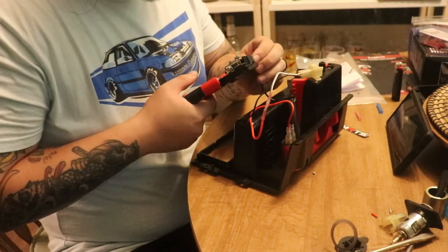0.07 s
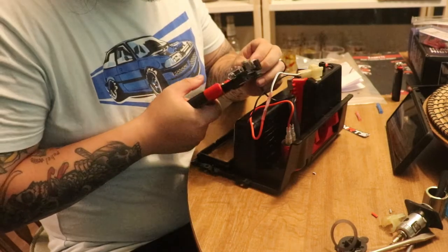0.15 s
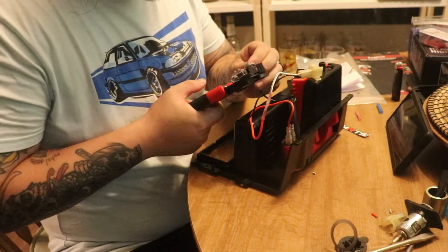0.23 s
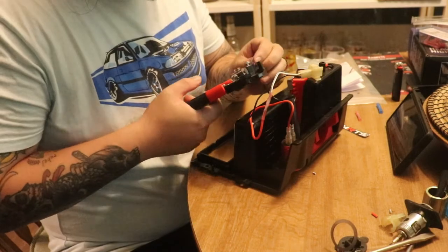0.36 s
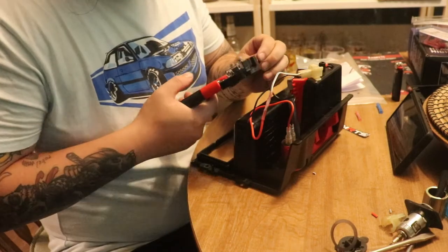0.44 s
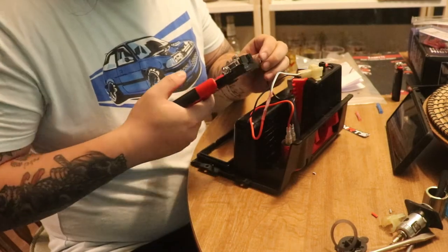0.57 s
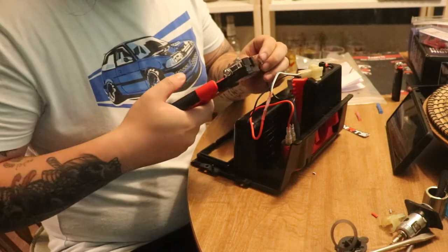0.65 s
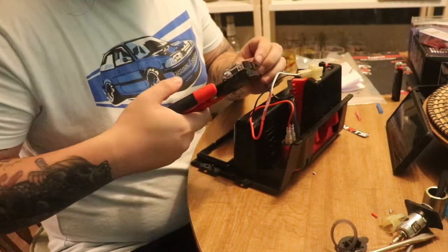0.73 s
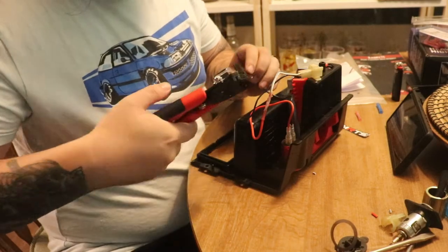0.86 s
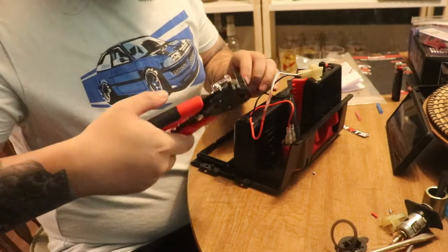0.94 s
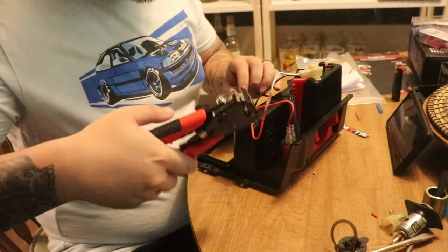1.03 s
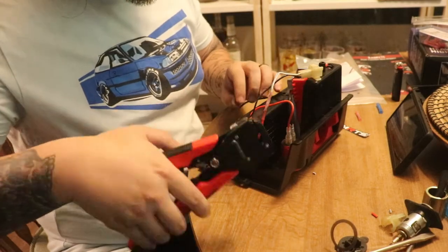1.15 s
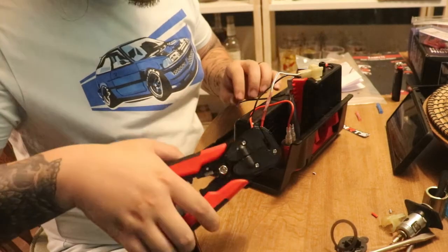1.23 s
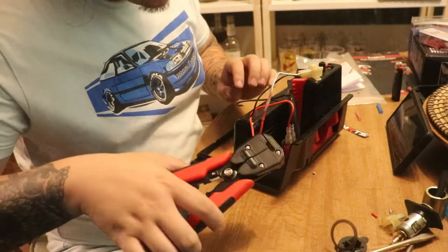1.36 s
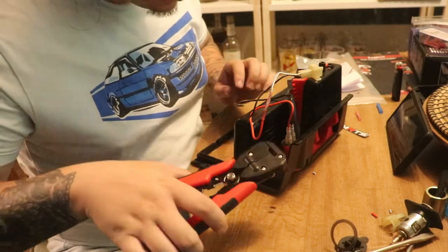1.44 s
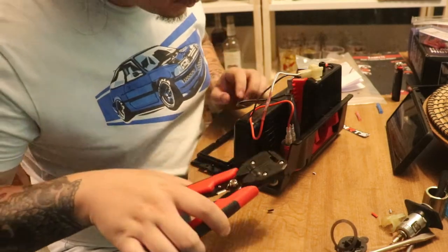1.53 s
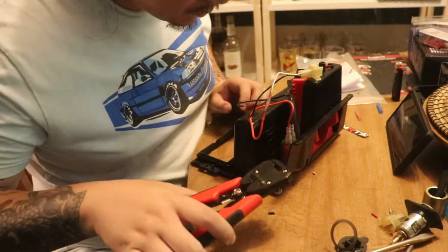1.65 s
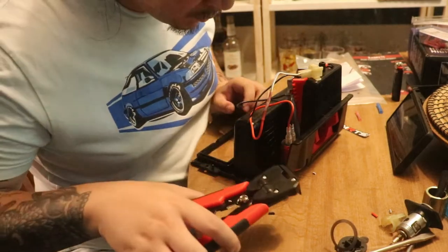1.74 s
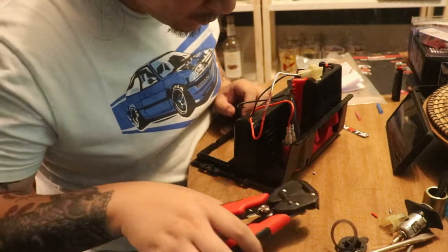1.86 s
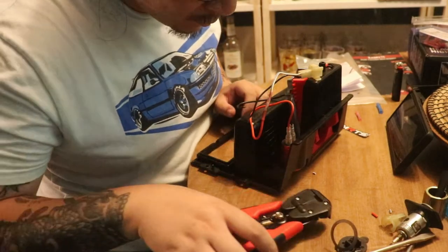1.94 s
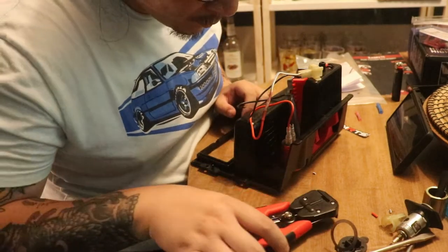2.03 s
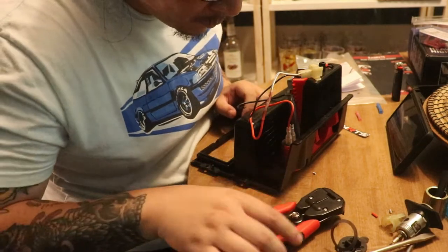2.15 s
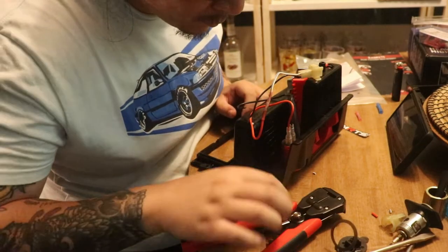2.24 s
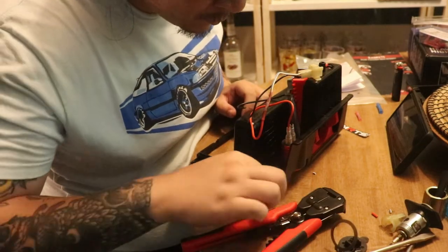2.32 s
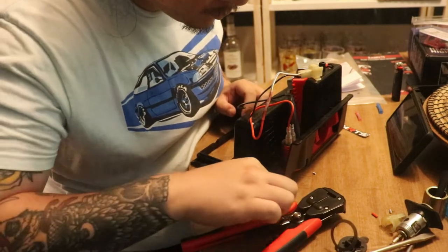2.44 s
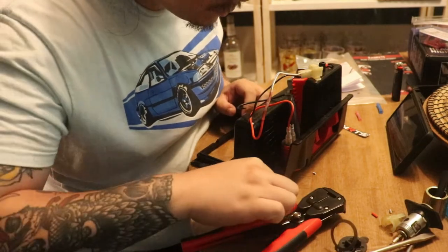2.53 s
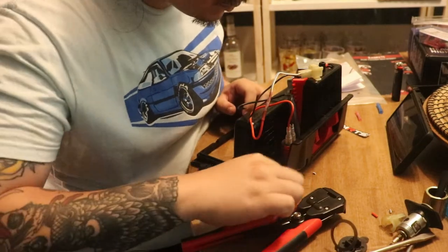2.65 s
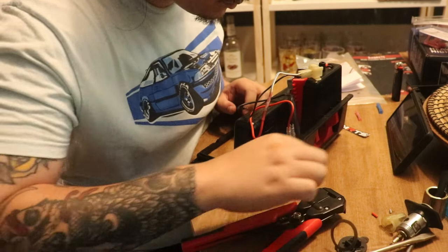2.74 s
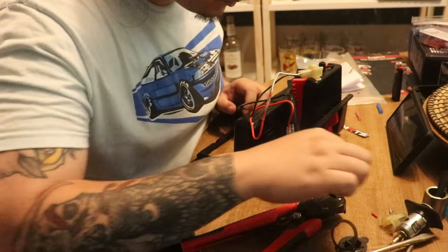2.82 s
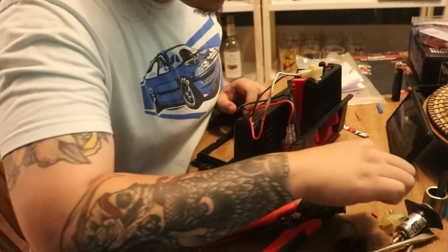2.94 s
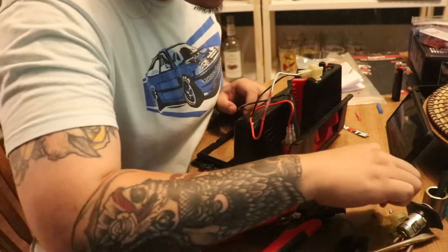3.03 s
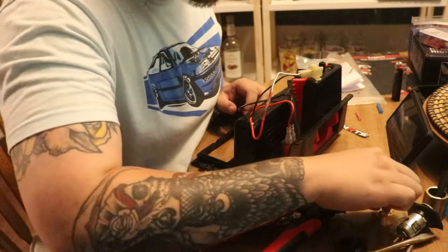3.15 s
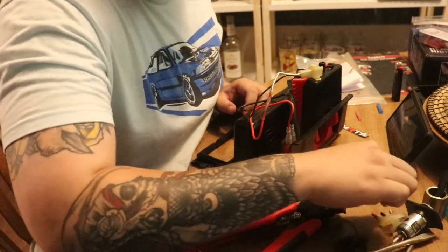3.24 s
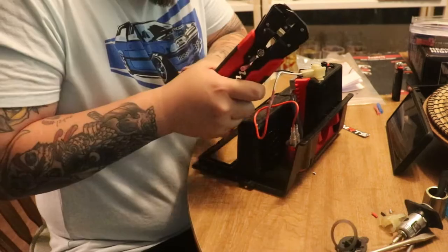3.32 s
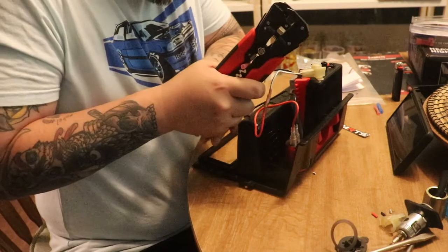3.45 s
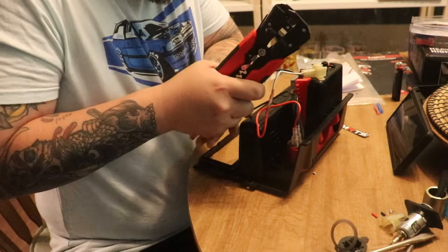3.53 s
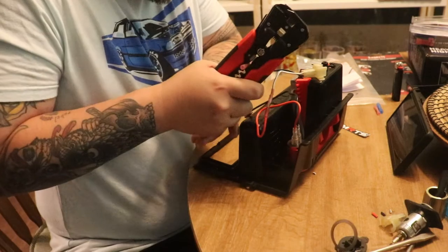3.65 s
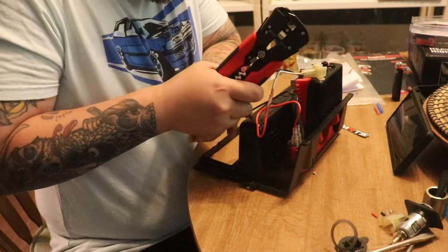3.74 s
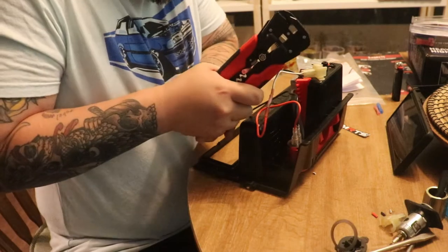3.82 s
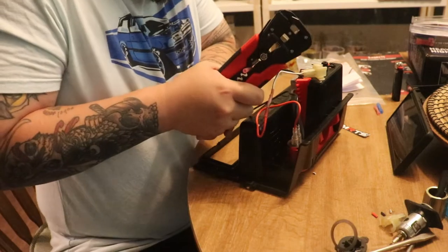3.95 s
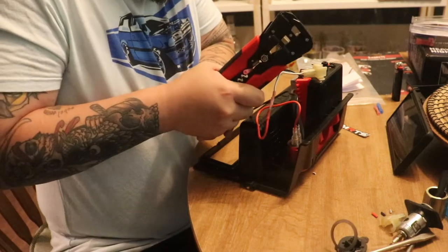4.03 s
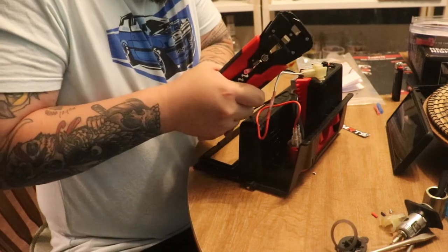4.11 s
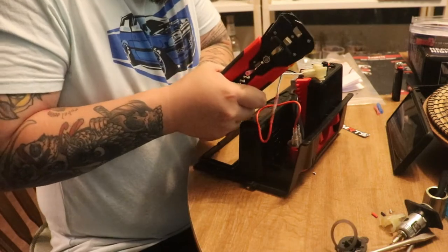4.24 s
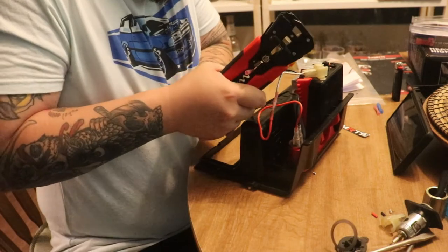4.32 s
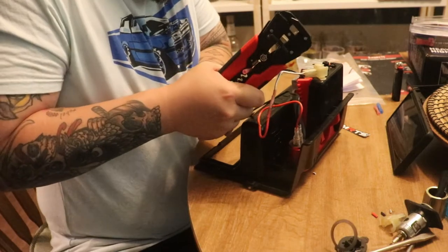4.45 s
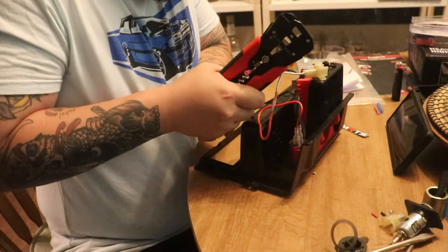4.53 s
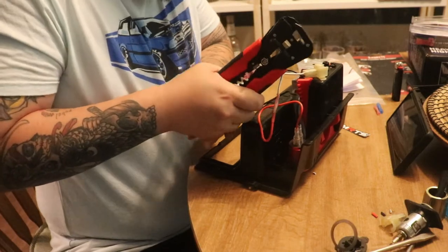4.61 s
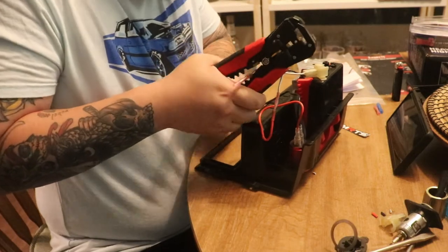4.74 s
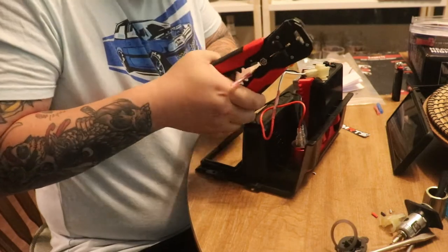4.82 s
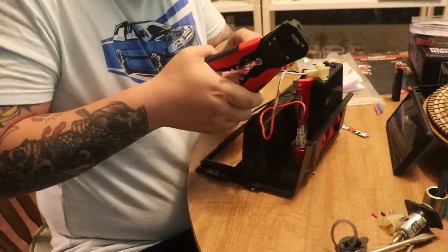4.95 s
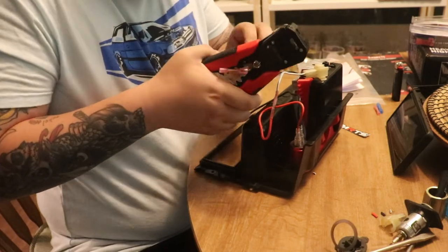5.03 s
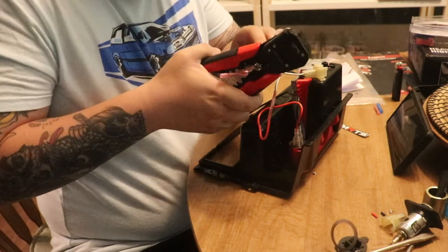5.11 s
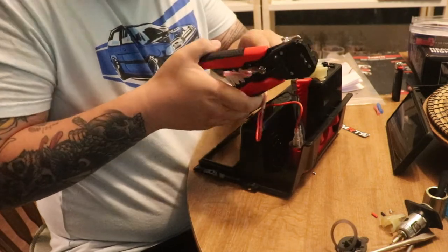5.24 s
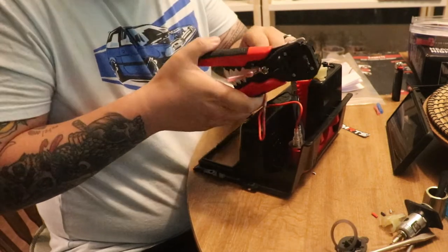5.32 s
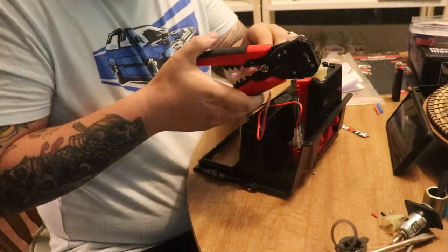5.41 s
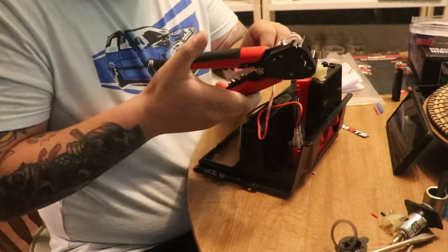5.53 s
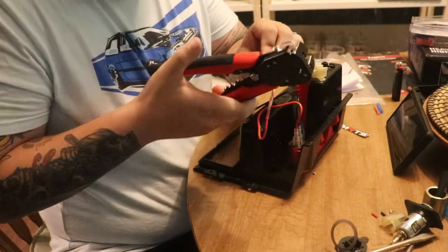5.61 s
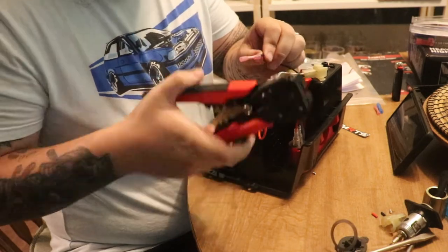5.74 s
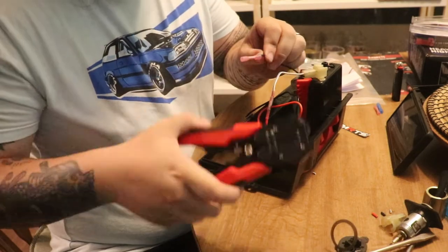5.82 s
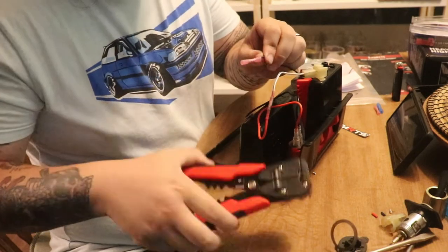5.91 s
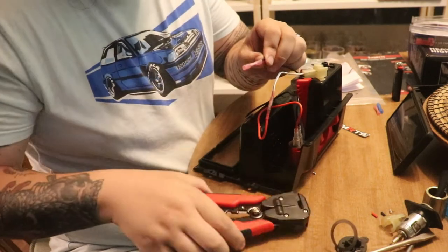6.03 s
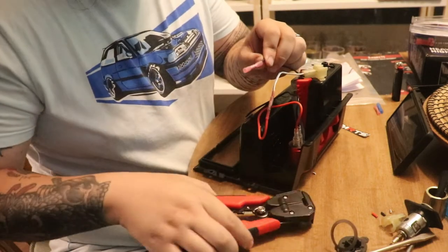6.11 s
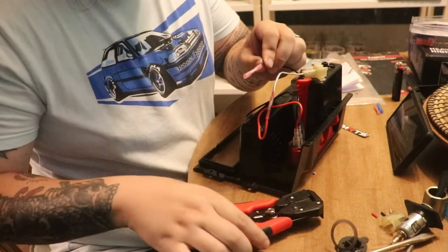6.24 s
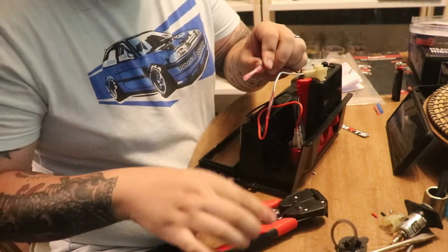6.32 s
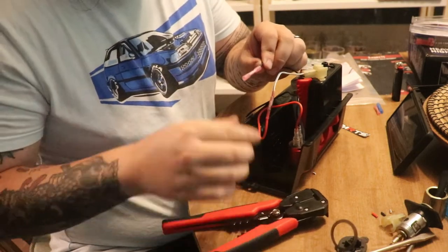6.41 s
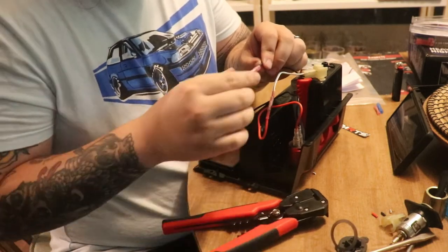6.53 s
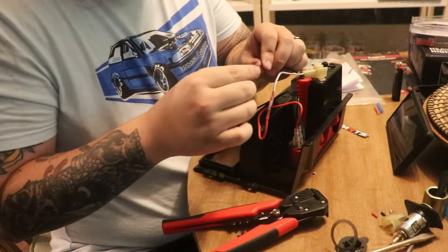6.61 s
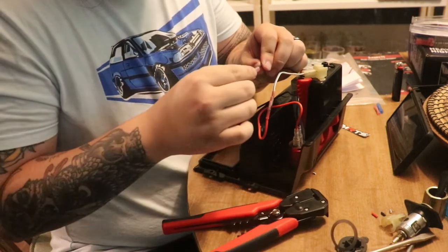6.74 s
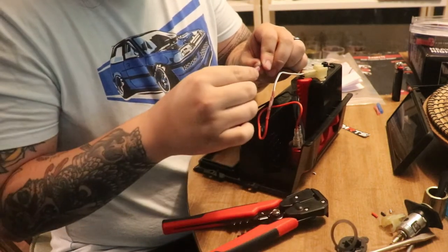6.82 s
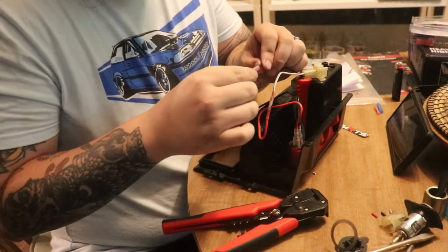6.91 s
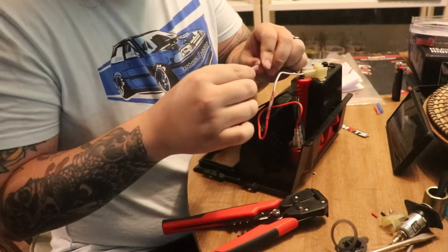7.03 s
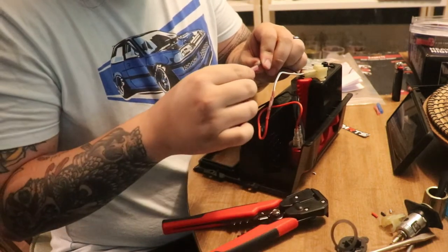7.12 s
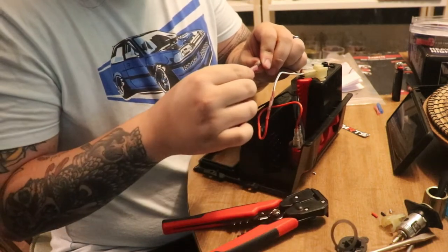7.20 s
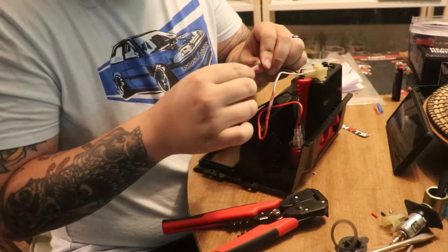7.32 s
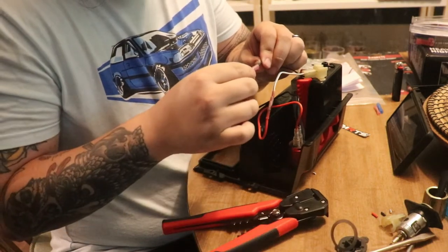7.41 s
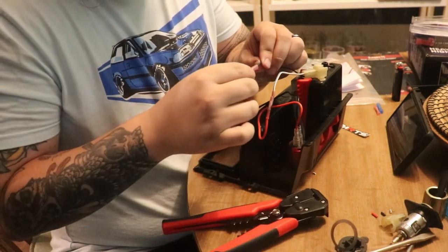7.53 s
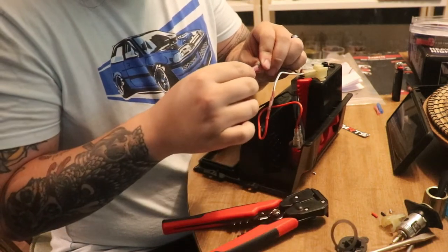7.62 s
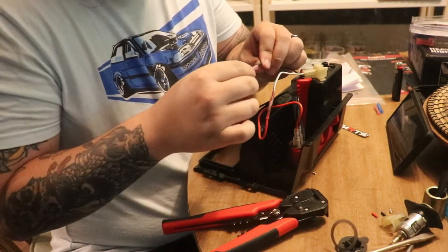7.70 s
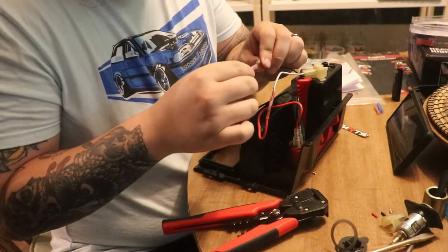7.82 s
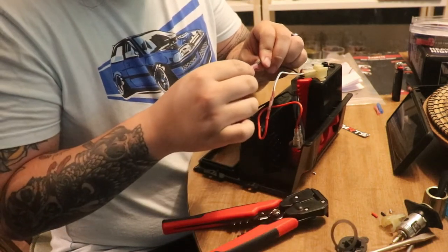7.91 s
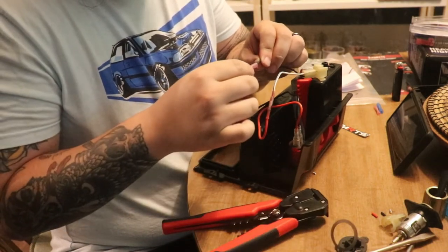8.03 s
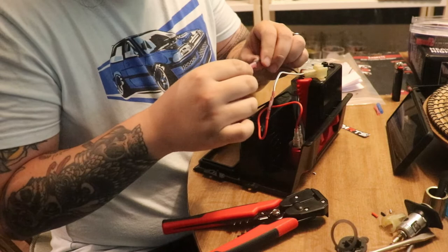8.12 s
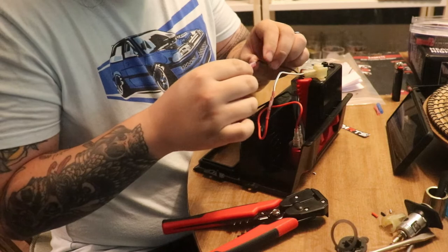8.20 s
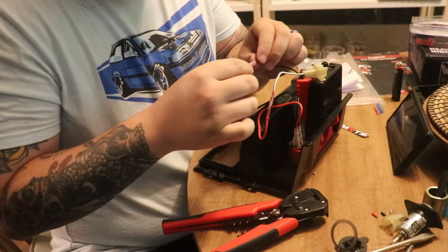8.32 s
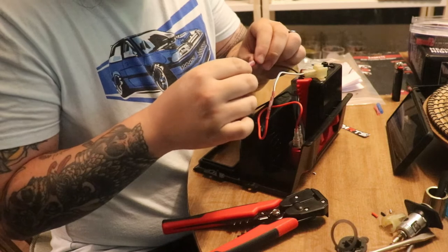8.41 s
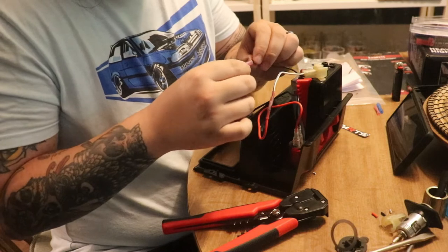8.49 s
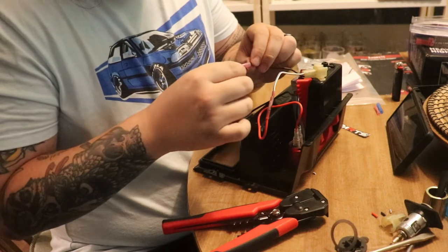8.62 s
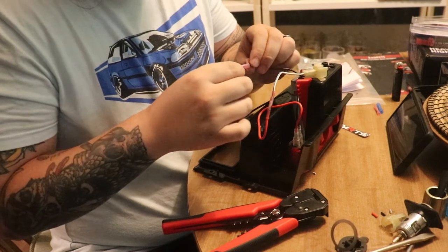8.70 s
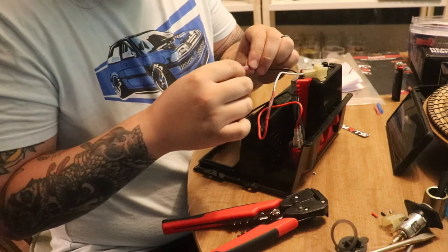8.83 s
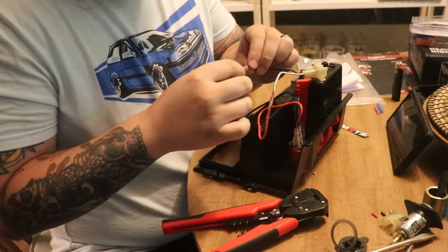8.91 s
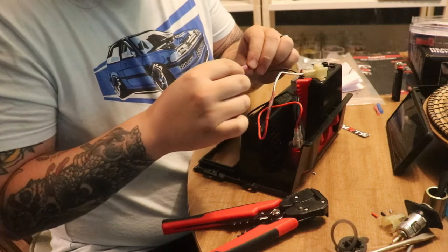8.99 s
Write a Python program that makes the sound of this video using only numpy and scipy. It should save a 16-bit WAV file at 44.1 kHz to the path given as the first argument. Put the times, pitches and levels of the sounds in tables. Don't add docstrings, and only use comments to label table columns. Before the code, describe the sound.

Metallic jaw clicks with rattle, a tool laid down with woody knocks, then faint wire scrapes, another snap, another clatter, and soft hollow taps over hiss.

```python
import sys
import numpy as np
from scipy import signal
from scipy.fft import rfft, irfft
from scipy.io import wavfile
from scipy.ndimage import uniform_filter1d

SR = 44100
rng = np.random.default_rng(int(sys.argv[2]) if len(sys.argv) > 2 else 0)


def amp(db):
    return 10 ** (np.asarray(db, float) / 20)


def write(x):
    x = np.atleast_2d(x).T
    wavfile.write(sys.argv[1], SR, np.round(np.clip(x, -1, 1) * 32767).astype(np.int16))


N = 399546

STEEL_SHARES, EDGE_SHARES = (0, -0.52, 1), (1, -0.0046, 0.93)

# start_s, strength_db, hardness_db, loudest_ring_hz
SNAPS = [(.1454, -16, -36, 2700), (.1474, -12.5, -14, 5150), (.1545, 2, -21, 2266), (.1579, -7, -8, 2170),
         (.1604, -9, -10, 5560), (.1694, -19, -1, 2200), (.1804, -28, 4, 2310), (.1854, -22, -14, 2150),
         (.2433, -26, -15, 2070), (.2564, -31, -5, 2270), (.2677, -40, 4, 2790), (.2696, -23, -18, 4800),
         (.2844, -31, -9, 2180), (.3296, -20, -8, 2290), (.3875, -18.5, -9, 5320), (.6044, -9.5, -9, 5350),
         (.6081, -13, -12, 3260), (.611, -8, -13, 4700), (.6164, -17, -18, 3030),
         (.6204, -12.5, -7.5, 3220), (4.9197, -9, -2, 4500), (4.9249, -8, -11, 5340),
         (4.9324, -24, -7, 5130)]


def jaw_snaps():
    return impacts(SNAPS, TABLE_MODES[9:], 960, 1.4, (-3, -26, 5), STEEL_SHARES, ring_db=6.0, focus_db=1.0)


# start_s, strength_db, hardness_db, loudest_ring_hz
TICKS = [(.0573, -44.5, -14, 2930), (.5144, -38, -21, 1900), (.9043, -39.5, -27, 2100),
         (1.2456, -36, -31, 2020), (1.296, -45, -18, 2960), (1.3364, -43.5, -24, 2100),
         (1.5005, -20, -14, 2260), (1.5114, -25, -26, 3170), (1.5723, -38, -7, 2680),
         (1.5764, -31.5, -14, 2280), (1.6014, -37, -17, 3230), (1.6174, -36.5, -12, 2750),
         (3.3075, -22, -13.5, 4960), (4.6149, -18, -23.5, 3150), (4.6329, -29, -17, 2720),
         (4.6478, -28, -24, 3000), (4.6828, -22.5, -22, 3160), (4.6917, -20, -27, 5700),
         (4.7024, -25, -22, 2400), (4.7501, -19, -13, 2370), (4.801, -32, -17, 2230)]


def tool_ticks():
    return impacts(TICKS, TABLE_MODES[5:], 490, 2.1, (-3, -25, 5), STEEL_SHARES, ring_db=0.5, focus_db=2.8)


# start_s, pitch_hz, level_db, t60_s
PINGS = [
    (.331, 11330, -23, .095),
    (.271, 9800, -37, .07),
    (4.693, 11330, -43, .06),
    (.388, 5150, -22, .011),
    (.3885, 5650, -22, .013),
]


def blade_pings():
    out, t = np.zeros(N), np.arange(SR // 4) / SR
    for start_s, pitch_hz, level_db, t60_s in PINGS:
        add(out, start_s, amp(level_db - 60 * t / t60_s) * np.sin(2 * np.pi * pitch_hz * t))
    return out


# time_s, pitch_hz, level_db
SQUEAK = [
    (.845, 10500, -68),
    (.865, 10150, -61),
    (.885, 9800, -66),
    (.905, 9500, -70),
]


def blade_squeak():
    out = np.zeros(N)
    time_s, pitch_hz, level_db = np.transpose(SQUEAK)
    t = np.arange(time_s[0], time_s[-1], 1 / SR)
    phase = 2 * np.pi * np.cumsum(np.interp(t, time_s, pitch_hz)) / SR
    add(out, time_s[0], amp(np.interp(t, time_s, level_db)) * np.sin(phase))
    return out


# pitch_hz, level_db, t60_s
TABLE_MODES = [(136.2, -26.5, 0.39), (153.3, -25, 0.35), (189, -15.5, .08), (239.4, -12.5, 0.062),
               (283.4, -11.5, 0.13), (415, -5.5, 0.061), (497, -6, 0.038), (663, -1, 0.0324),
               (754, -3, 0.033), (970, 4.5, 0.01), (1053.6, -6, 0.062), (1114, 3.5, 0.0083),
               (1410, 0.5, 0.016), (1736, -4, .015)]
# start_s, strength_db, hardness_db, loudest_ring_hz
HEAD_KNOCKS = [
    (2.05, -14.5, 20.7, 2395),
    (2.0534, -9.5, 4, 705),
    (6.1021, -3, 14.3, 2077),
]


def head_knocks():
    return impacts(HEAD_KNOCKS, TABLE_MODES, 115, 2.3, (-6, 9, -17), EDGE_SHARES, ring_db=-2.0, focus_db=4.5)


# start_s,
# strength_db, hardness_db, loudest_ring_hz
GRIP_KNOCKS = [(2.0648, -24.5, 0, 663), (2.1116, -21, 13.5, 694), (2.1605, -18.5, -20, 390),
               (2.2326, -2.5, 5.5, 1280), (2.2366, -10, -27, 720), (2.2434, -11.5, 4, 734),
               (2.3014, -16.5, 0, 1050), (2.3278, -24, 5, 876), (.1548, -31.5, -22, 383),
               (3.3128, -24.5, -14, 430), (3.3215, -21.5, -18, 257), (6.1103, -10.5, 3, 760),
               (6.1294, -17, -0.5, 753), (6.345, -4, 9, 1088), (6.3523, -10.5, -5, 417),
               (6.3564, -22, 6, 786), (6.4398, -23, -1, 1040), (6.603, -44, 0, 1030)]


def grip_knocks():
    return impacts(GRIP_KNOCKS, TABLE_MODES, 100, 2.77, (-6, 9, -32), EDGE_SHARES, ring_db=-2.5, focus_db=10.5)


# pitch_hz, level_db, t60_s
CASE_MODES = [(159, -14, 0.1), (240, -11.5, 0.043), (301, -12.5, 0.065), (398, 1.5, 0.094),
              (487, -6, 0.039), (671, -9, 0.024), (770, -5.5, 0.037), (965, -8, 0.0453),
              (1066, -1.5, 0.021), (1377, -4.5, 0.025)]
# start_s, strength_db, hardness_db, loudest_ring_hz
TAPS = [(3.2955, -28, -16, 380), (3.3135, -23, -5, 451), (3.5579, -44, 9.5, 2000), (3.3508, -28, 6, 770),
        (3.4211, -38.5, 12.5, 1000), (3.4646, -36, 10.5, 3180), (3.485, -41, 12.5, 1920),
        (3.5398, -41, 5, 408), (4.3145, -34.5, 0, 426), (4.3594, -40, -5, 420), (4.3974, -41, 1.5, 406),
        (4.566, -40.5, -6, 416), (4.6884, -30.5, 1, 392), (4.7511, -28, 5, 1020), (4.7724, -26.5, 1.5, 382),
        (5.0264, -36, 2, 411), (5.1, -44.5, 12, 1970), (5.246, -39.5, 0, 398), (5.406, -34.5, 1, 406),
        (5.5042, -40, -3, 388), (5.5409, -43, -14, 390), (5.5807, -45, -4, 1400), (4.8015, -29, 4, 1070),
        (4.624, -39, -10.5, 395), (5.445, -53, 12, 2140), (8.1989, -39.5, -18, 366),
        (8.53, -36.5, 1, 398.4), (8.6128, -41.5, 0, 394), (8.7215, -38, 1, 398), (9.0534, -35, 5, 2360)]


def case_taps():
    return impacts(TAPS, CASE_MODES, 143, 4.6, (-1.5, 7, -16), EDGE_SHARES, ring_db=2.0, focus_db=6.5)


# start_s, length_s, pressure_db, scratch_over_case_db, scratch_centre_hz
RUBS = [(1.22, 0.16, -52, -4, 2300), (3.29, 0.043, -33, 5, 3300), (3.353, 0.03, -43, -1, 2700),
        (3.423, .04, -44, -2, 2300), (3.473, 0.033, -41, 6, 2700), (3.521, .08, -44.5, 1, 2700),
        (4.303, 0.062, -40, -2.5, 2700), (4.362, .06, -42, -8, 2300), (4.61, 0.063, -39, -10, 3300),
        (4.684, 0.041, -30, -6, 2700), (4.743, 0.053, -29, -1, 2700), (4.789, 0.067, -30.5, -6, 2290),
        (5.031, 0.13, -41.5, -2.5, 2200), (5.201, 0.2, -42, -6.5, 2170), (5.399, 0.059, -37.5, -8, 2180),
        (5.495, 0.074, -38, -10, 2200), (5.563, 0.067, -45.5, -5, 1800), (8.118, 0.085, -45.5, -16.5, 2200)]


def case_rubbing(slips_per_s=2200, uneven_db=4.0, focus_db=6.0):
    out = np.zeros(N)
    rise_share, lift_db = 0.29, -24.5
    for start_s, length_s, press_db, scratch_db, scratch_hz in RUBS:
        u = np.arange(0, length_s, 1 / SR) / length_s
        press = amp(press_db - 9.5 + lift_db * np.maximum(u - rise_share, 0) ** 2)
        press *= np.minimum(u / rise_share, 1)
        slips = (rng.random(8820) < slips_per_s / SR) * amp(uneven_db * rng.standard_normal(8820))
        scratch_modes = around(FRAME_MODES, scratch_hz, focus_db)
        for modes, level_db in ((CASE_MODES, 0), (scratch_modes, scratch_db)):
            tone = ring(modes, rng.standard_normal(30), 0.72 * modes[0][0])
            scale = np.linalg.norm(tone) * np.sqrt(np.mean(slips ** 2))
            add(out, start_s, amp(level_db) / scale * signal.fftconvolve(slips[:len(u)] * press, tone))
    return out


# start_s, strength_db, hardness_db, loudest_ring_hz
FLICKS = [
    (3.956, -42, -6, 900),
    (4.133, -42, 8.5, 2040),
    (5.8711, -56, 8, 1830),
    (5.9299, -50, 4.5, 996),
]


def wire_flicks():
    return impacts(FLICKS, TABLE_MODES[5:], 450, 1.095, (-1.5, 7, -22), EDGE_SHARES, ring_db=-1.0, focus_db=11.0)


# pitch_hz, level_db, t60_s
FRAME_MODES = [(1750, -1, 0.0027), (2300, -3, 0.0099), (2750, -3, 0.0052), (3340, -1.5, 0.0082),
               (3617, -5.5, 0.0084), (4300, -6, 0.0035), (4620, -9, 0.01), (5150, -6, 0.0096),
               (5600, -6, 0.0036), (5560, -5.5, 0.005)]
# pitch_hz, level_db, t60_s
JAW_MODES = [(6600, -5, .004), (7300, -4, .004), (8000, -1, .005), (8800, -3, .004), (9600, -3, .005),
             (10500, -3, .004), (11400, -1, .006), (12400, -4, .004), (13500, -6, .004), (14800, -8, .003)]


def impacts(blows, low_modes, low_edge_hz, contact_ms, trims_db, hard_shares, ring_db, focus_db):
    out, t = np.zeros((2, N)), np.arange(1024) / SR
    chances = rng.standard_normal((len(blows), 1114))
    for (start_s, blow_db, hard_db, ring_hz), chance in zip(blows, chances):
        force = np.exp(-1000 * t / contact_ms) + 1.64 * np.exp(-t / 0.0001)
        onset = np.minimum(1000 * t / (0.034 * contact_ms ** 2), 1)
        contact = rfft(chance[90:] * force * onset)
        contact = irfft(contact / abs(contact)) * np.exp(-300 * t / contact_ms)

        frame_modes = around(FRAME_MODES, ring_hz, focus_db)
        body_modes = around(low_modes, ring_hz, 0.48 * focus_db)
        jaw_modes = around(JAW_MODES, ring_hz, 1.3 * focus_db)
        loudest = (ring_hz, ring_db, 24 / ring_hz)
        (body_modes if ring_hz < 1500 else frame_modes).append(loudest)
        frame = ring(frame_modes, chance, 1390)
        low = ring(body_modes, chance[28:], low_edge_hz)
        jaws = ring(jaw_modes, chance[60:], 5500)

        levels_db = blow_db + np.array(trims_db) + hard_db * np.array(hard_shares)
        for body, level_db, blur_hz in zip((frame, low, jaws), levels_db, (800, 90, 1500)):
            sound = signal.fftconvolve(contact, body)[:8192]
            sound *= amp(level_db + 13.5) / np.linalg.norm(sound)
            add(out[0], start_s, sound)
            add(out[1], start_s, all_round(sound, body, blur_hz))
    return out


def around(modes, ring_hz, db_per_octave):
    return [(hz, db - db_per_octave * abs(np.log2(hz / ring_hz)), t60) for hz, db, t60 in modes]


def ring(modes, chance, above_hz, spread=.012, uneven_db=1.3):
    pitch_hz, level_db, t60_s = np.transpose(modes)[:, :, None]
    t = np.arange(8192) / SR
    detune, uneven = chance[:2 * len(modes)].reshape(2, -1, 1)
    decay = amp(level_db + uneven_db * uneven - 60 * t / t60_s)
    waves = decay * np.sin(2 * np.pi * pitch_hz * (1 + spread * detune) * t)
    waves[::2] *= -1
    return steep(waves.sum(0), above_hz, "high")


def all_round(sound, body, blur_hz):
    z = rfft(sound)
    power = uniform_filter1d(abs(rfft(body)) ** 2, size=round(blur_hz * len(sound) / SR))
    spread = irfft(z * np.sqrt(abs(power)) / (abs(z) + 1e-12))
    spread *= np.exp(-np.arange(len(sound)) / 2500)
    return spread * np.linalg.norm(sound) / np.linalg.norm(spread)


def steep(x, hz, kind, order=4):
    return signal.sosfilt(signal.butter(order, hz, kind, fs=SR, output="sos"), x)


def add(mix, start_s, sound):
    part = mix[round(start_s * SR):][:len(sound)]
    part += sound[:len(part)]


# start_s, level_db, length_ms
JOLTS = [
    (2.233, -43.5, 11),
    (6.102, -45.5, 8.2),
    (6.349, -20.5, 3),
]


def stand_jolts():
    out = np.zeros(N)
    for start_s, level_db, length_ms in JOLTS:
        u = np.arange(4000) / SR * 1000 / length_ms * 3
        add(out, start_s, amp(level_db) * np.e * u * (2 - u) * np.exp(-u))
    return out


# band_hz, t60_s
ROOM_DECAY = [(150, 0.58), (400, 0.45), (1040, 0.5), (2760, 0.46), (7280, 0.37), (14000, 0.37)]
# band_hz, level_db
ROOM_COLOUR = [(150, -3.5), (900, -1.5), (2500, -5), (4100, -4), (5200, -3), (6500, -0.5), (10000, -12),
               (15000, -20)]


def room(x):
    taps = np.zeros((3, SR))
    at = np.arange(300, SR - 20, 20) + rng.integers(0, 20, (3, (SR - 301) // 20))
    np.put_along_axis(taps, at, rng.choice([-1., 1.], at.shape), 1)
    hz, t, z = signal.stft(taps, SR, nperseg=256)
    decay = amp(-60 * t / read(ROOM_DECAY, hz)[:, None])
    tails = signal.istft(z * decay, SR, nperseg=256)[1]
    tails /= np.linalg.norm(tails[0])
    hz, t, z = signal.stft(tails, SR, nperseg=256)
    tails = signal.istft(z * amp(read(ROOM_COLOUR, hz))[:, None], SR, nperseg=256)[1]
    turns = np.cos(np.pi * (np.arange(N) / SR * 3 + np.arange(3)[:, None] / 3)) * np.sqrt(2 / 3)
    return signal.fftconvolve(x * turns, tails, axes=1)[:, :N].sum(0)


# band_hz, density_db
HISS = [(25, -5), (55, 0), (209, 0), (322, -3), (420, -4), (900, -9), (2060, -14), (15500, -23)]


def hiss(level_db=-55.5):
    hz = np.fft.rfftfreq(1024, 1 / SR)
    a, b, patches = rng.standard_normal((N // 256 + 5, 513, 3)).T
    patches = evened(uniform_filter1d(uniform_filter1d(patches, 10, 0), 14, 1))
    z = (a + 1j * b) * amp(read(HISS, hz)[:, None] + 0.84 * patches)
    return amp(level_db) * evened(signal.istft(z, nperseg=1024, noverlap=768)[1][:N])


def evened(x):
    return x / np.sqrt(np.mean(x ** 2) + 1e-20)


def read(points, hz):
    f, value = np.transpose(points)
    return np.interp(np.log(hz + 1), np.log(f + 1), value)


def scene():
    tool = jaw_snaps() + tool_ticks() + blade_pings() + blade_squeak()
    table = head_knocks() + grip_knocks()
    case = case_taps() + case_rubbing()
    flicks = wire_flicks()
    direct = tool[0] + table[0] + case[0] + flicks[0]
    to_walls = amp(-5) * tool[1] + amp(-4.5) * table[1] + amp(-2.5) * case[1] + amp(-6) * flicks[1]
    return (direct + room(to_walls) + stand_jolts() + hiss())[None]


def band_limit(x):
    return signal.sosfilt(signal.butter(12, 16730, fs=SR, output="sos"), x)


# time_s, gain_db
SCENE_CHANGE = [
    (3.247, 4),
    (3.25, -51),
    (3.258, -35),
    (3.274, 3),
]


def record(dry):
    power_db = 10 * np.log10(abs(uniform_filter1d(dry[0] ** 2, 200)) + 1e-12)
    fall_db = np.arange(N) * 60. / SR
    held_db = np.maximum.accumulate(power_db + fall_db) - fall_db
    over_db = np.maximum(held_db + 13.5, 0)
    ducked = dry / amp(0.56 * uniform_filter1d(over_db, 60))
    faded = ducked * amp(np.interp(np.arange(N) / SR, *np.transpose(SCENE_CHANGE)))
    treble_edge = signal.firwin(301, 15900, window=("kaiser", 3), fs=SR)[None]
    mix = np.clip(signal.oaconvolve(faded, treble_edge, "same"), -1, 1)
    return band_limit(mix)


dry = scene()
out = record(dry)
write(out)
```